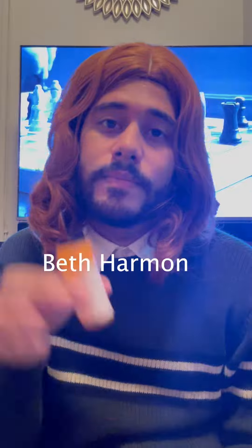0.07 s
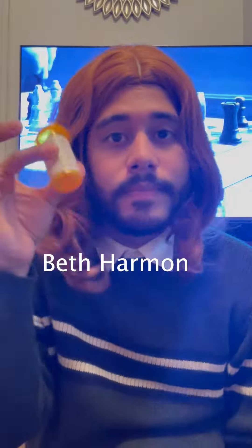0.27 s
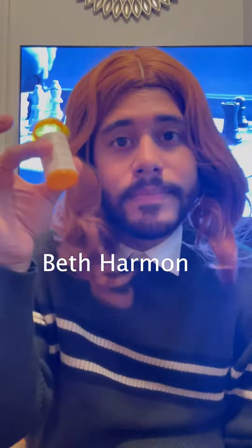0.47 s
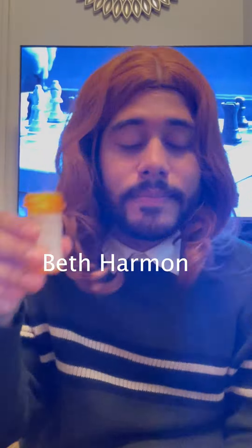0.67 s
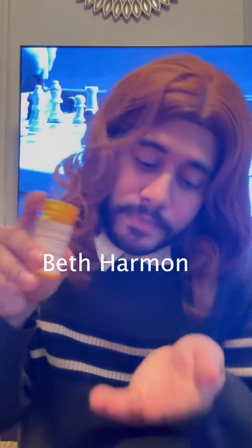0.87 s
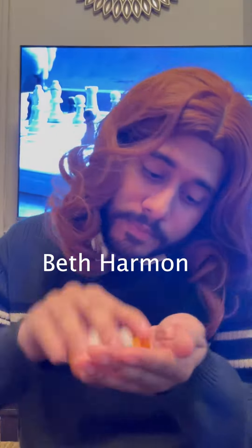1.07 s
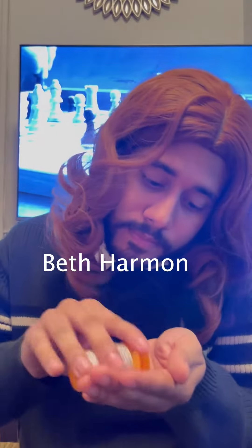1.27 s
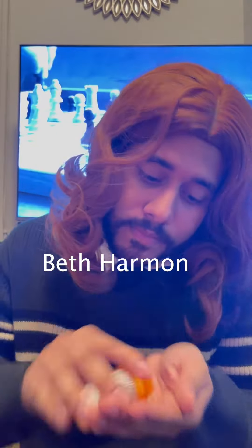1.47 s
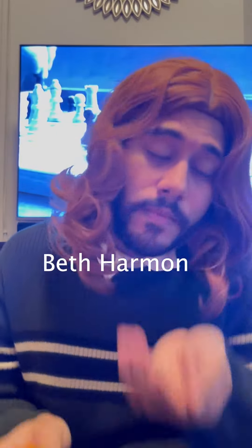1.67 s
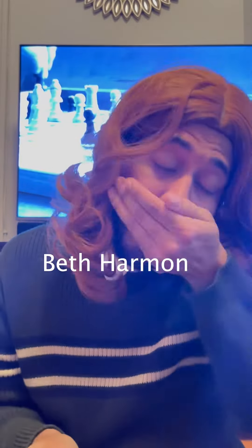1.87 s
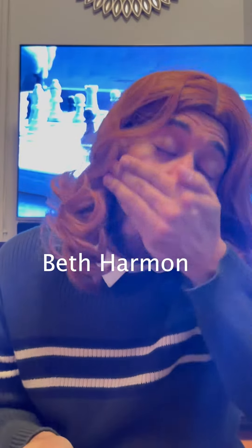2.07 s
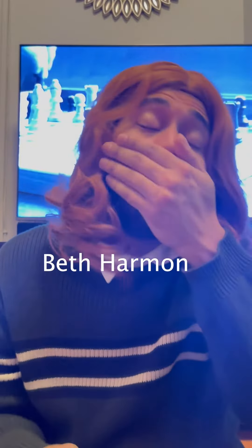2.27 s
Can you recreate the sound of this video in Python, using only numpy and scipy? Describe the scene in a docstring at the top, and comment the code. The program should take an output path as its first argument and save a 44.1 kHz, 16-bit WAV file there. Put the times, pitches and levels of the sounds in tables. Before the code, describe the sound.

Pills rattle in a small plastic bottle, close to a stereo microphone in a quiet room. From about 0.1 to 0.65 seconds a vigorous shake gives dense, bright, hard clicks with hollow plastic ringing. After a near pause, softer clumps tumble onto a palm from 1.0 to 1.6, ending in a low dull knock near 1.65. Faint room tone remains, with a barely audible rustle around 2.15.

```python
"""In a quiet room, pills rattle in a small plastic bottle: shaken, then tipped out over a palm.
Each blow is a bright tick of shaped noise plus a short, wavering-free sine for the ringing bottle wall.
The air inside hums low: a narrow filter stirred by the blows, plus a few breathy hums and a dull knock.
A faint rustle, a short echo and steady room tone surround it; two microphone ports listen close by."""
import sys
import numpy as np
from scipy import signal
from scipy.fft import rfft, irfft, next_fast_len
from scipy.io import wavfile

SR = 44100
rng = np.random.default_rng(int(sys.argv[2]) if len(sys.argv) > 2 else 0)


def dump_mix(stems):
    """Bounce the given channels to the path in sys.argv[1] as a 16-bit WAV at rate SR."""
    frames = np.atleast_2d(stems).T  # one column per channel
    limited = np.clip(frames, -1, 1)  # hard clip at full scale
    pcm = np.round(limited * 32767).astype(np.int16)
    wavfile.write(sys.argv[1], SR, pcm)


N = 102179


def gain_of(db):
    """Turn decibels into a plain multiplier."""
    return 10 ** (np.asarray(db) / 20)


def evened(x):
    """Scale a sound to an average (RMS) level of 1."""
    return x / np.sqrt(np.mean(x ** 2) + 1e-20)


def read(points, hz):
    """Read a curve of (f/Hz, value) points, with pitch on a logarithmic scale."""
    f, value = np.transpose(points)
    return np.interp(np.log(hz + 1), np.log(f + 1), value)


def add(mix, s, sound):
    """Mix a sound in at time s, cutting whatever runs past the end."""
    part = mix[round(s * SR):][:len(sound)]
    part += sound[:len(part)]


def strike(rise_s, t60_s, size):
    """A rounded rise and an exponential fall (60 dB in t60_s), peak 1."""
    t = np.arange(size) / SR
    shape = (1 - np.exp(-t / rise_s)) ** 2 * gain_of(-60 * t / t60_s)
    return shape / shape.max()


def resonate(x, hz, sharpness):
    """Let through mostly the sound around one pitch, as a resonance does."""
    b, a = signal.iirpeak(hz, sharpness, SR)
    return signal.lfilter(b, a, x)


def causal(points):
    """Minimum-phase filter: it gives the colour without sounding ahead of time."""
    hz = abs(np.fft.fftfreq(2048, 1 / SR))
    log_gain = np.log(gain_of(read(points, hz)))
    spectrum = np.exp(np.conj(signal.hilbert(log_gain)))
    return np.fft.ifft(spectrum).real[:512]


# Colour of the room tone, before its overall level is set: (f/Hz, relative level/dB)
ROOM_TONE_COLOUR = [(30, -14), (55, 3), (150, -11), (300, -11.5), (620, -27.5), (2000, -36), (8800, -51.5),
                    (10400, -36), (12600, -56)]
ROOM_TONE_DB, ROOM_TONE_MONO_HZ = -56, 460  # average level; below this pitch both sides are alike


def room_tone():
    """Steady coloured noise: the rumble is the same on both sides, the middle looser, the top mostly shared."""
    hz = np.fft.rfftfreq(N, 1 / SR)
    both, left, right = rfft(rng.standard_normal((3, N)))
    rumble_share = 1 / (1 + (hz / ROOM_TONE_MONO_HZ) ** 6)
    shared = np.maximum(rumble_share, .9 * (hz > 6000))
    noise = np.sqrt(shared) * both + np.sqrt(1 - shared) * np.array([left, right])
    coloured = irfft(noise * gain_of(read(ROOM_TONE_COLOUR, hz)), N)
    return gain_of(ROOM_TONE_DB) * evened(coloured)


ROOM_DB, ROOM_SHARED = -7.5, .5  # echo level; share of the low part common to both sides
ROOM_T60_S, ROOM_TREBLE_T60_S = .3, .11  # time to fall 60 dB
ROOM_RISE_S = .0018  # time constant of the soft start


def room(x):
    """Echoes as a fading noise tail; the treble dies sooner and is more alike on both sides."""
    t = np.arange(SR // 2) / SR
    both, left, right = rng.standard_normal((3, len(t)))
    taps = np.sqrt(ROOM_SHARED) * both + np.sqrt(1 - ROOM_SHARED) * np.array([left, right])
    low = signal.filtfilt(*signal.butter(2, 6000, fs=SR), taps)
    high = signal.filtfilt(*signal.butter(2, 6000, "high", fs=SR), both + .5 * taps)
    tail = low * gain_of(-60 * t / ROOM_T60_S) + high * gain_of(-60 * t / ROOM_TREBLE_T60_S)
    tail = tail * (1 - np.exp(-t / ROOM_RISE_S))
    tail = tail / np.linalg.norm(tail[0])
    return gain_of(ROOM_DB) * signal.fftconvolve(x[None], tail, axes=1)[:, :N]


# Bright colour shared by the pill ticks and the rustle: (f/Hz, level/dB)
TICK_COLOUR = [(650, -20.5), (1500, -9), (2250, -2), (2800, -6), (5200, 3), (10800, 0.5), (12200, -4.5),
               (14600, -56)]


def tick_coloured(x):
    """Filter a sound so its pitches are as strong as in a pill tick."""
    return signal.oaconvolve(x, causal(TICK_COLOUR))[:N]


# A faint soft rustle: (t/s, length/s, level/dB at the top of the swell)
RUSTLES = [(2.139, 0.19, -66)]


def rustle():
    """A soft swell of bright noise that rises faster than it falls."""
    swell = np.zeros(N)
    for s, length, db in RUSTLES:
        u = np.arange(0, 1, 1 / (length * SR))
        add(swell, s, gain_of(db) * np.sin(np.pi * np.sqrt(u)) ** 2)
    return swell * evened(tick_coloured(rng.standard_normal(N)))


# Air in the bottle stirred into a breathy hum: (t/s, level/dB before fading, f/Hz, 60 dB fade/s)
BREATHY_HUMS = [(0.946, -57, 1073, .5), (1.469, -60, 1130, 0.98), (1.568, -41.5, 1139, 0.14),
                (2.168, -52, 1145, 0.17)]
AIR_RISE_S, AIR_JOSTLE_DB = .0012, 8  # rise time constant; boost of the hum stirred by blows
AIR_HZ, AIR_WIDTH_HZ = 1110, 80  # pitch and width of the air resonance


def air_hum(struck):
    """The air resonates near one pitch, stirred by ticks and wall rings; noise through it sounds breathy."""
    air = np.zeros(N)
    for s, db, hz, t60 in BREATHY_HUMS:
        noise = rng.standard_normal(9000)
        breath = evened(resonate(resonate(noise, hz, 3), hz, hz / AIR_WIDTH_HZ))
        breath = breath * np.hanning(2 * len(noise))[len(noise):]  # fade smoothly to nothing
        add(air, s, gain_of(db) * strike(AIR_RISE_S, t60, len(noise)) * breath)
    stirred = resonate(resonate(struck, AIR_HZ, 2), AIR_HZ, AIR_HZ / AIR_WIDTH_HZ)
    return air + gain_of(AIR_JOSTLE_DB) * stirred


KNOCK_S, KNOCK_DB, KNOCK_HZ, KNOCK_T60_S = 1.6645, -43, 905, .032


def dull_knock():
    """One dull knock as the bottle leaves the palm: a low sine that fades fast."""
    out, t = np.zeros(N), np.arange(1024) / SR
    add(out, KNOCK_S, gain_of(KNOCK_DB - 60 * t / KNOCK_T60_S) * np.sin(2 * np.pi * KNOCK_HZ * t))
    return out


WALL_HZ, WALL_SCATTER = 3510, .055  # ring pitch; it differs per blow by up to this fraction
WALL_PEAK_S = .00086  # time from the start of a ring to its loudest point


def wall_rings(rows):
    """Each blow makes the plastic wall ring: a sine that swells and dies within milliseconds."""
    wall, t = np.zeros(N), np.arange(1024) / SR
    ring = (t / WALL_PEAK_S * np.exp(1 - t / WALL_PEAK_S)) ** 2
    for s, wall_db, _ in rows:
        hz = WALL_HZ * (1 + WALL_SCATTER * np.tanh(rng.standard_normal()))
        add(wall, s - WALL_PEAK_S / 2, gain_of(wall_db) * ring * np.sin(2 * np.pi * hz * t))
    return wall


TICK_RISE_S, TICK_T60_S, TUMBLE_T60_S = .00015, .006, .013  # rise time constant; 60 dB fades
TICK_TINT_DB = 5  # typical size of each tick's own random tint
TIP_S = .98  # from here the pills tumble in clumps onto the palm, with longer ticks


def pill_ticks(rows):
    """Each blow is a tiny burst of noise with its own tint, all given the bright tick colour."""
    ticks, size = np.zeros(N), 1024
    snap = strike(TICK_RISE_S, TICK_T60_S, size)
    tumble = strike(TICK_RISE_S, TUMBLE_T60_S, size)
    bins = np.sqrt(np.linspace(0, 1, size // 2 + 1))
    for s, _, tick_db in rows:
        tint_db = TICK_TINT_DB * np.interp(bins, np.linspace(0, 1, 9), rng.standard_normal(9))
        noise = irfft(rfft(rng.standard_normal(size)) * gain_of(tint_db))
        shape = tumble if s > TIP_S else snap
        tick = shape * noise
        same_energy = np.linalg.norm(shape) / np.linalg.norm(tick)
        add(ticks, s, gain_of(tick_db) * tick * same_energy)
    return tick_coloured(ticks)


# The distinct blows: (t/s, wall ring level/dB, tick level/dB before colouring)
DISTINCT_BLOWS = [(0.1088, -28, -50), (0.1195, -14, -22), (0.124, -17, -15.5), (0.1386, -24, -18),
                  (0.1422, -26, -16.5), (0.1455, -22, -18), (0.158, -23.5, -43), (0.1684, -24, -38),
                  (0.1815, -9.5, -25), (0.1994, -29.5, -23), (0.2039, -11.5, -40), (0.2407, -16, -13.5),
                  (0.2509, -38, -12.5), (0.2587, -20, -26), (0.2942, -13, -31), (0.3026, -4.5, -14),
                  (0.3062, -11, -27), (0.3162, -20, -15.5), (0.3518, -23.5, -42.5), (0.3656, -19, -15.5),
                  (0.3782, -21.5, -19.5), (0.4177, -12, -28), (0.4238, -22.5, -37.5),
                  (0.4272, -21.5, -19.5), (0.4388, -10.5, -18.5), (0.4434, -15.5, -27),
                  (0.4465, -14.5, -19.5), (0.4488, -15.5, -40), (0.5246, -18, -25), (0.5385, -21.5, -15.5),
                  (0.5428, -12, -35.5), (0.5541, -16, -43), (0.5594, -21, -36.5), (0.5636, -22, -29),
                  (0.5755, -22, -23), (0.5814, -7, -16.5), (0.5844, -9.5, -19), (0.5896, -16.5, -22),
                  (0.622, -23, -31), (0.6384, -24.5, -26), (0.6531, -24, -30.5), (0.8161, -32, -43.5),
                  (0.8208, -50, -58), (0.8387, -28.5, -43), (0.8423, -36, -48.5), (0.8828, -54, -63),
                  (0.9735, -41.5, -48.5), (1.0006, -41.5, -33.5), (1.0176, -38.5, -20.5),
                  (1.0438, -56.5, -25), (1.0732, -45, -28), (1.0945, -29.5, -35.5), (1.107, -30, -36.5),
                  (1.1415, -27.5, -25.5), (1.1448, -50.5, -19.5), (1.1498, -43, -19), (1.1543, -34, -20.5),
                  (1.1868, -38.5, -22), (1.1935, -48, -19.5), (1.2053, -45, -15), (1.2618, -26.5, -45.5),
                  (1.2722, -29, -28), (1.2822, -21, -23), (1.3028, -40, -23), (1.3082, -47.5, -21.5),
                  (1.3431, -55, -25.5), (1.3617, -31.5, -12.5), (1.4214, -55, -27.5), (1.5399, -44, -35.5),
                  (1.568, -36, -28), (1.5795, -32.5, -21.5), (1.5933, -35.5, -28.5)]
# Lowest levels of the small blows between, as a curve: (t/s, wall ring level/dB, tick level/dB before colouring)
JOSTLE_CURVE = [(.07, -44, -41), (.3, -40, -38.5), (.5, -48.5, -46.5), (.6, -37.5, -39.5),
                (0.671, -86, -54.5), (.83, -65, -79), (0.93, -70.5, -81), (1.016, -62.5, -28.5),
                (1.118, -45, -73.5), (1.188, -53, -26.5), (1.263, -54, -61.5), (1.363, -50.5, -33),
                (1.519, -64, -88.5), (1.586, -38, -33.5), (1.718, -64.5, -71.5), (1.9, -85, -95.5)]
JOSTLE_PER_S = 400  # average number of small blows per second
JOSTLE_SPREAD_DB, JOSTLE_MOST = 5.5, 2.2  # average extra level before the cap; cap in multiples of it


def blows():
    """The distinct blows and a random crowd of small ones, as rows (t/s, wall level/dB, tick level/dB)."""
    t, wall_db, tick_db = np.transpose(JOSTLE_CURVE)
    draw = rng.random((1200, 3))
    s = t[0] - np.cumsum(np.log(draw[:, 0])) / JOSTLE_PER_S  # random gaps
    extra_db = JOSTLE_SPREAD_DB * np.minimum(-np.log(draw[:, 1:]), JOSTLE_MOST)
    crowd_wall_db = np.interp(s, t, wall_db) + extra_db[:, 0]
    crowd_tick_db = np.interp(s, t, tick_db) + extra_db[:, 1]
    crowd = np.c_[s, crowd_wall_db, crowd_tick_db]
    return np.r_[DISTINCT_BLOWS, crowd[s < t[-1]]]


def bottle():
    """Every blow ticks and rings the wall, and both together set the air humming."""
    rows = blows()
    struck = wall_rings(rows) + pill_ticks(rows)
    return struck + air_hum(struck) + dull_knock()


def scene():
    """The close sounds, their echo in the room and the room tone."""
    near = bottle() + rustle()
    return near + room(near) + room_tone()


# How far the left port runs ahead of the right: (f/Hz, lead/radians)
PORT_LEAD = [(2100, .1), (2900, .9), (3800, -.1), (4500, -2.7), (5100, -2.3), (5800, .1), (9000, 3.1),
             (12000, 6.3)]
START_S, OPENING_S = .0685, .0021  # opening silence; length of the fade-in
EDGE_HZ = 16200  # pitches above this are cut


def record(dry):
    """The two ports hear each pitch at their own phase; the sound opens after a short silence."""
    size = next_fast_len(N + 2048)
    hz = np.fft.rfftfreq(size, 1 / SR)
    lead = read(PORT_LEAD, hz) * np.minimum(hz / PORT_LEAD[0][0], 1)
    turn = np.exp(.5j * np.array([lead, -lead]))  # half the lead on each side
    ports = irfft(rfft(dry, size) * turn, size)[:, :N]
    ports = ports * np.clip((np.arange(N) / SR - START_S) / OPENING_S, 0, 1)
    lowpass = signal.firwin(511, EDGE_HZ, window=("kaiser", 9), fs=SR)
    return signal.oaconvolve(ports, lowpass[None], "same")


dry = scene()
out = record(dry)
dump_mix(out)
```